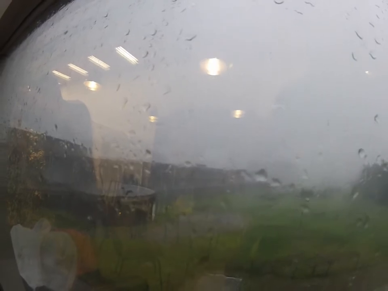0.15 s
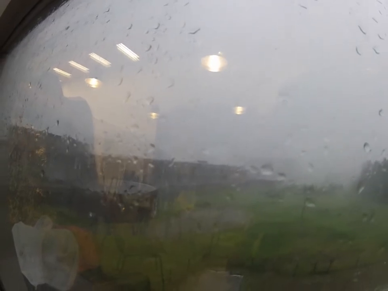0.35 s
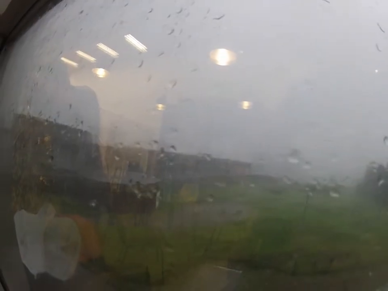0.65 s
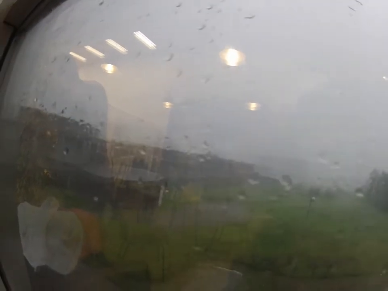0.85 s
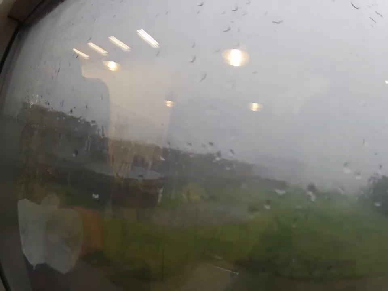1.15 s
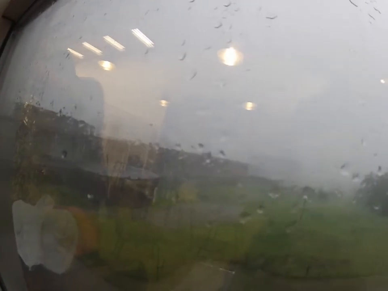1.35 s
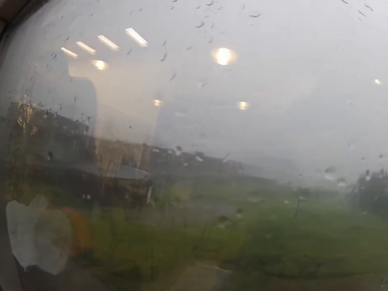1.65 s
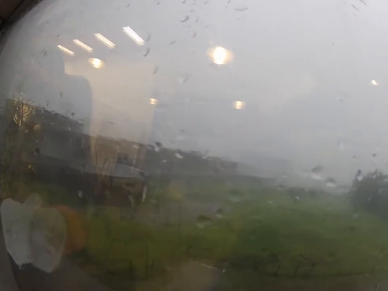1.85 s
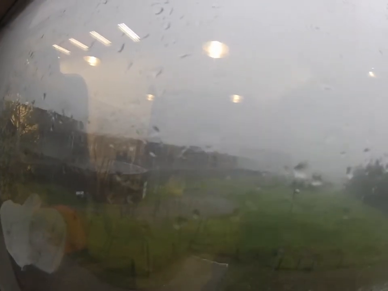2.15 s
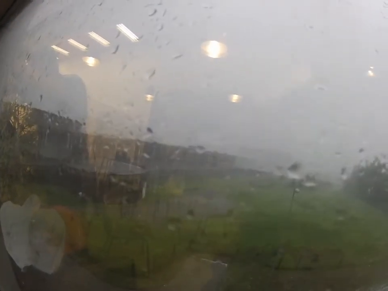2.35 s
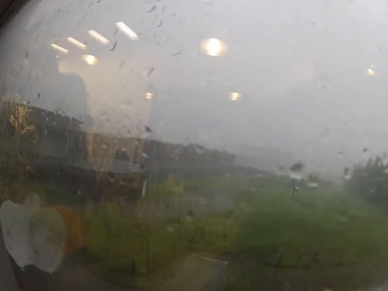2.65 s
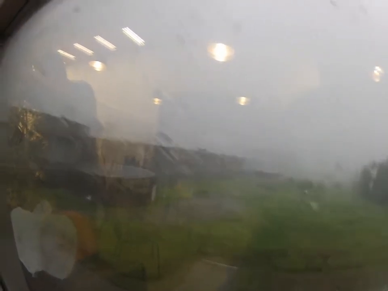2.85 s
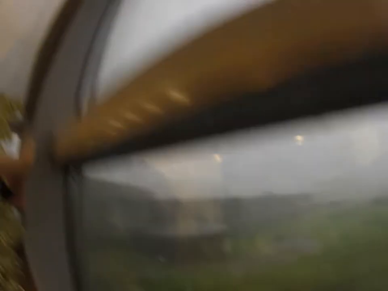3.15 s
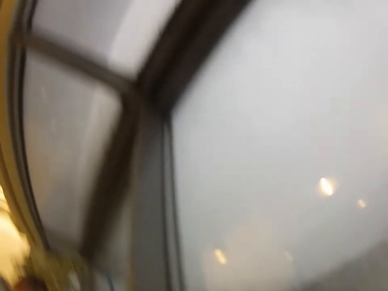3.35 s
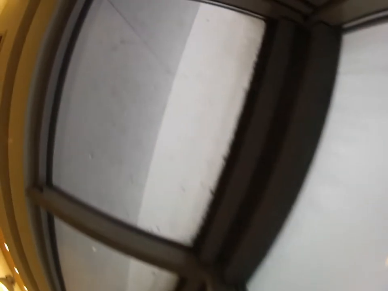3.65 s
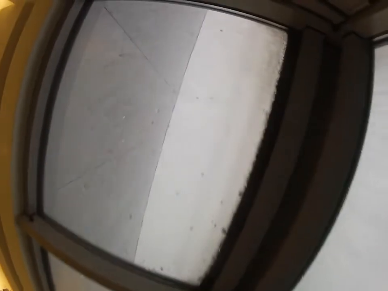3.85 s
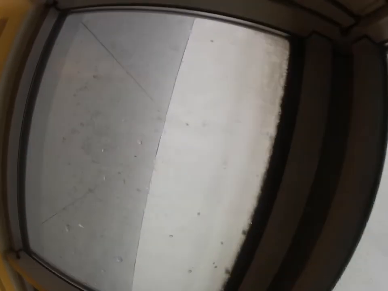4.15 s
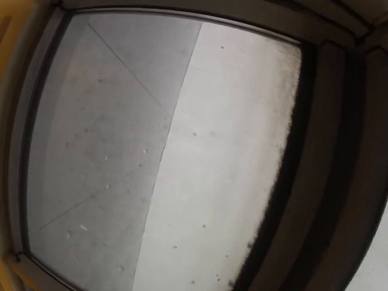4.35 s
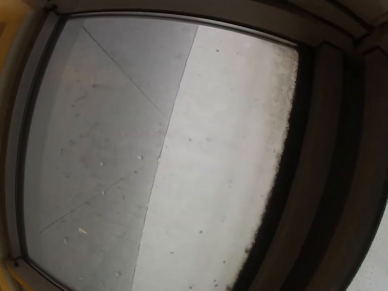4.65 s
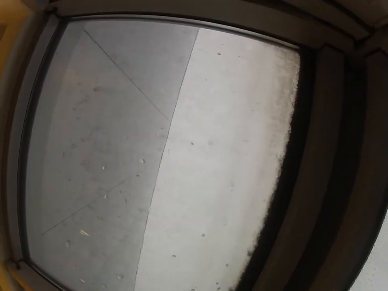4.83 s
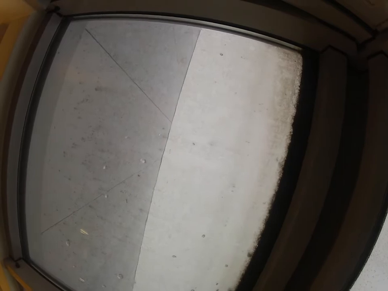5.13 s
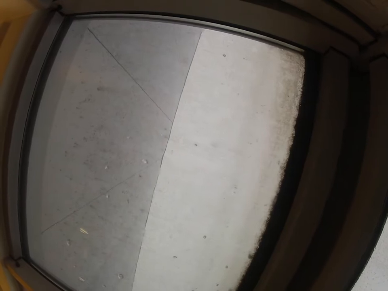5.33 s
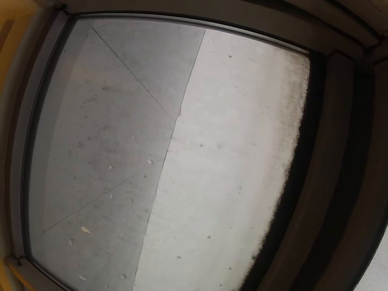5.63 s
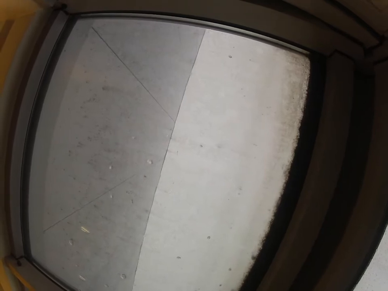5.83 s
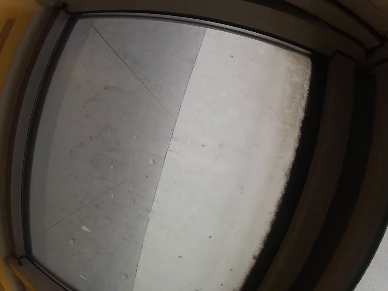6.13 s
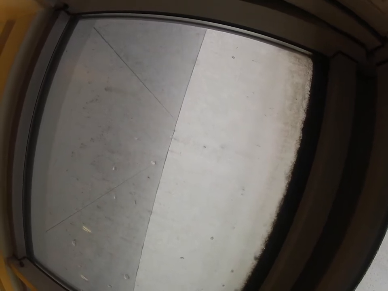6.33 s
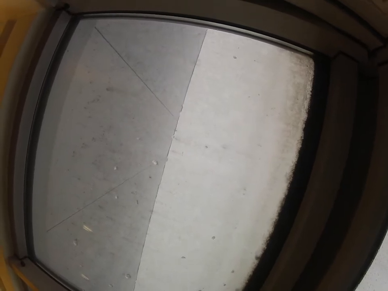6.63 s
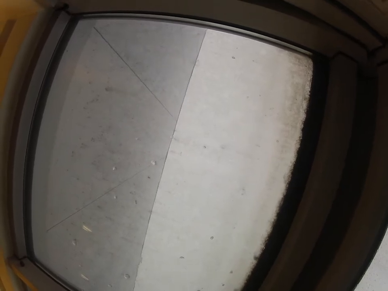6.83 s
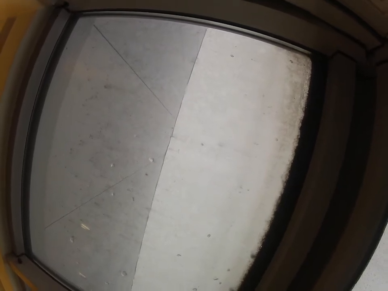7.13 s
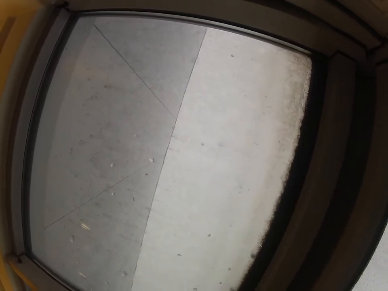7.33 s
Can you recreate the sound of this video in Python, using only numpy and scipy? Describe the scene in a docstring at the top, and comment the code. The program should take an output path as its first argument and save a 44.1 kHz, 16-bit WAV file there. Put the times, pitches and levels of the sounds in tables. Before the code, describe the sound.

A hailstorm heard through glass in a room with a faint reverberant tail: quiet rumble, hiss and light patter, with isolated crisp taps. Close and dry over it are handling sounds: soft thuds, rough skin squeaks, a violent plastic clack at about two seconds, then more rubbing and knocks while the camera is turned. The end is calmer, with taps on the pane. Rough, gritty small-microphone treble.

```python
"""Hail on a window pane

A hail storm is heard indoors through a pane, by a small microphone shut in a plastic housing.
Shaped noise gives the storm's rumble, roar and hiss; short noise bursts give the hailstones on the glass.
Damped sines make the housing knock and thud; bands of noise make it squeak and rattle as the hand rubs it.
The converter holds each sample, which mirrors the sound into the treble."""
import sys
import numpy as np
from scipy import signal
from scipy.fft import rfft, irfft, next_fast_len
from scipy.io import wavfile

SR = 44100
rng = np.random.default_rng(int(sys.argv[2]) if len(sys.argv) > 2 else 0)


def dump_mix(stems):
    """Bounce the given channels to the path in sys.argv[1] as a 16-bit WAV at rate SR."""
    frames = np.atleast_2d(stems).T  # one column per channel
    limited = np.clip(frames, -1, 1)  # hard clip at full scale
    pcm = np.round(limited * 32767).astype(np.int16)
    wavfile.write(sys.argv[1], SR, pcm)


N = 330121

# Gusts of the storm: (time [s], rumble level [dB], pane roar level [dB], hiss level [dB])
STORM_GUSTS = [(0, -54, -48.5, -53), (.35, -50, -49, -56.5), (1.21, -53.5, -49.5, -55),
               (1.87, -50, -50.5, -56), (2.04, -46, -50, -57), (2.48, -41.5, -47.5, -56.5),
               (2.75, -52, -49.5, -55.5), (2.92, -48, -55.5, -57), (3.27, -46.5, -49.5, -55.5),
               (3.54, -47, -56.5, -56), (4.11, -42, -61.5, -55), (4.4, -45, -63, -59),
               (4.71, -48, -57.5, -57), (5.4, -48, -59, -56.5), (5.98, -51, -58.5, -59.5),
               (6.78, -49, -57.5, -58.5), (7.49, -48.5, -62.5, -57.5)]
# Relative power density of wind rumble, pane roar and hiss: (frequency [Hz], level [dB])
RUMBLE_SPECTRUM = [(20, 6.5), (40, 3.5), (90, 2), (140, -7), (220, -13.5), (400, -58.5)]
ROAR_SPECTRUM = [(60, -9), (130, 7.5), (250, 3), (400, -5), (600, -17.5), (1000, -23.5)]
HISS_SPECTRUM = [(200, -21.5), (380, -0.5), (600, -5.5), (800, -11.5), (1050, -7.5), (1400, -13.5),
                 (1640, -8.5), (1850, -11), (2200, -5), (2650, -14), (3250, -13), (3800, -13.5),
                 (4200, -22.5), (5400, -19.5), (6500, -24.5)]
# The same for the scrape of rubbing: (frequency [Hz], level [dB])
SCRAPE_SPECTRUM = [(600, -29), (950, 0.5), (1300, 2.5), (1700, -2), (2000, -6)]
# Hailstones on the glass: (time [s], splash level [dB], centre [Hz], T60 [s],
# pane ring re splash [dB], glassy ping re splash [dB])
HAILSTONES = [(0.6679, -51, 2960, 0.2, -21, -23), (1.167, -47, 3310, 0.12, -21, -28),
              (1.1898, -48.5, 2230, 0.086, -22, -23), (1.649, -53, 2130, .12, -18, -27),
              (2.13, -54.5, 1930, .1, -21, -24), (2.5286, -46, 2040, 0.07, -32, -2.5),
              (2.7258, -50.5, 1570, 0.099, -21, -29), (2.9523, -44, 3050, 0.11, -6, 3.5),
              (3.4892, -53, 2200, 0.12, -15, -3), (4.6711, -45.5, 3250, 0.12, 2, -17),
              (4.7635, -31.5, 2570, 0.042, -5, -12), (4.7769, -38.5, 1950, 0.029, -28, -23),
              (4.9067, -50, 2830, 0.11, -5, -20), (4.929, -57, 2130, .089, -13, -26),
              (5.2355, -54, 2250, 0.14, -4, -26), (5.881, -61, 3250, .051, 6, -23),
              (6.4406, -61, 3210, 0.068, 4, -23), (6.5297, -50.5, 2260, 0.062, -5, -29),
              (6.549, -52, 2680, 0.2, -15, -28), (6.8389, -55.5, 2050, .1, -16, -27),
              (6.948, -54.5, 3140, .18, -8, -28), (7.2198, -57.5, 2140, 0.24, -15, -22)]
# Resonances of the pane: (frequency [Hz], width [Hz], level [dB])
PANE_MODES = [(1600, 94, -17), (2070, 83, -21), (3230, 120, 17), (3550, 120, -4)]
# Soft thuds of the hand: (time [s], level before the envelope [dB], frequency [Hz])
HAND_THUDS = [(0.449, -28, 93), (2.338, -28.5, 80.7), (2.699, -30.5, 101), (2.737, -32, 58.5),
              (3.085, -26.5, 124), (3.119, -29.5, 133), (3.429, -29.5, 108), (3.67, -35.5, 144),
              (3.766, -27, 94), (3.847, -28.5, 144), (4.141, -29, 51), (4.47, -38, 112), (5.228, -31, 65),
              (5.921, -35, 79), (6.167, -34, 75.4), (6.588, -37.5, 113), (6.77, -32.5, 76),
              (7.029, -37, 51), (7.091, -31, 99)]
# Rubbing strokes: (time of top [s], rise [s], T60 [s], squeak level [dB], squeak centre [Hz],
# upper band re squeak [dB], upper band centre [Hz], scrape re squeak [dB])
RUB_STROKES = [(0.487, 0.0096, 0.83, -48.5, 2064, -9, 3840, -23),
               (.64, 0.072, 1.6, -55, 2024, -10.5, 3600, -17),
               (1.185, .015, 1.4, -56, 2165, -5.5, 3430, -8), (2.44, 0.15, .7, -59, 2050, -12, 3590, -9),
               (3.19, .04, 0.34, -56.5, 2170, -7, 3650, -11), (3.42, 0.32, 1.5, -57.5, 2380, -8, 3670, -3),
               (3.64, 0.21, 0.27, -54, 2415, -11, 3510, -8), (3.765, 0.19, 0.35, -51, 2400, -14, 3600, -4),
               (3.855, 0.1, 0.3, -53.5, 2325, -9, 3570, -2.5),
               (4.098, 0.25, 0.052, -45.5, 2238, -6, 3774, -6.5),
               (4.56, 0.18, 0.81, -66, 2230, 3, 3290, -12)]
# Modes of the housing walls: (frequency [Hz], level [dB], T60 [s])
HOUSING_MODES = [(332, -15, 0.034), (506, -10.5, 0.019), (805, -5.5, 0.012), (975, -2, 0.0084),
                 (1214, -8.5, 0.018), (1654, 0, 0.012), (2274, -0.5, 0.014), (3230, -15, 0.011)]
# Loose parts rattling: (time of top [s], rise [s], T60 [s], low modes level [dB], high modes re low [dB])
RATTLE_SWELLS = [(1.936, 0.011, 0.05, -25.5, -9), (1.96, .008, 0.1, -37, -31), (3.191, 0.016, .05, -50, -8),
                 (3.244, 0.017, 0.067, -33, -20), (4.236, 0.0026, 0.051, -47, -17),
                 (4.268, 0.0014, 0.029, -30.5, -26)]
# Pings of the latch: (time [s], level before the envelope [dB])
LATCH_STRIKES = [(4.234, -31.5)]
# Knocks on the housing: (time [s], direction [sign], thud level before low-pass [dB], thud frequency [Hz],
# thud T60 [s], crack level before low-pass [dB], hardness as crack cutoff [Hz])
HOUSING_KNOCKS = [(1.9068, 1, -1, 140, 0.039, -3.5, 2500), (1.909, -1, -8.5, 213, 0.026, -4.5, 2480),
                  (1.9358, -1, -16, 176, 0.074, -19, 2170), (1.9554, -1, -11, 172, 0.055, -25, 910),
                  (1.9725, 1, -10, 167, 0.054, -52, 610), (1.995, 1, -25.5, 94, 0.27, -53, 400),
                  (3.22, 1, -30, 160, .04, -31.5, 1300), (3.2346, 1, -25, 146, 0.092, -43, 900),
                  (3.2416, 1, -15, 154.6, 0.094, -21.5, 1160), (3.261, -1, -22, 140, .061, -30.5, 1280),
                  (3.78, -1, -39, 147, .04, -35.5, 2600), (4.233, 1, -12, 128, .04, -26, 1900),
                  (4.2657, 1, -13.5, 127, 0.018, -28.5, 900), (4.267, 1, -15.5, 129, 0.053, -32, 4500)]

PATTER_PER_S, PATTER_DB, PATTER_T60_S = 53, -71.5, 0.014
PING_HZ, PING_WIDTH_HZ, PING_T60_S = 4740, 1400, 0.07
HALL_T60_S, HALL_DB = 1, -19
THUD_T60_S = 0.073
SQUEAK_CORNER_HZ, UPPER_CORNER_HZ = 100, 170   # of the noise that modulates each band's carrier
SWELL_FROM_DB = -28.5
LATCH_HZ, LATCH_T60_S = 3980, .016
HOLD_HZ, OVERLOAD = 12000, .7   # sampling rate; clipping amplitude
CUTOFF_HZ = 15800


def from_db(db):
    """Level law: amplitude gain is ten to the power of decibels over twenty."""
    return 10 ** (np.asarray(db) / 20)


def rms_one(x):
    """Normalization of power: scale to unit rms."""
    return x / np.sqrt(np.mean(x ** 2) + 1e-20)


def in_time(rows):
    """Linear interpolation: table columns become curves with one value a sample."""
    s, *columns = np.transpose(rows)
    return [np.interp(np.arange(N) / SR, s, c) for c in columns]


def slow(rate_hz):
    """Low-pass filtering: white noise through two equal one-pole stages fluctuates slowly, rms 1."""
    r = np.exp(-2 * np.pi * rate_hz / SR)
    noise = rng.standard_normal(N + SR)
    return rms_one(signal.lfilter([1], [1, -2 * r, r * r], noise)[SR:])   # first second settles the filter


def coloured(spectrum):
    """Spectral shaping: white noise is weighted by a table in the frequency domain, rms 1."""
    size = next_fast_len(N)
    hz, level_db = np.transpose(spectrum)
    log_hz = np.log(np.arange(size // 2 + 1) * SR / size + 1)
    gain = from_db(np.interp(log_hz, np.log(hz), level_db, left=-70, right=-70))
    white = rfft(rng.standard_normal(size))
    return rms_one(irfft(gain * white, size)[:N])


def narrow(corner_hz):
    """Modulation: slow complex noise on a carrier is a narrow band; returns a function of its centre."""
    shape = slow(corner_hz) + 1j * slow(corner_hz)
    return lambda hz: np.real(shape * np.exp(2j * np.pi * hz * np.arange(N) / SR))


def fade(t, t60):
    """Exponential decay: the level falls 60 dB in each t60."""
    return from_db(-60 * t / t60)


def swell(s, rise_s, t60):
    """Exponential growth and decay: the level climbs evenly in dB to its top at s, then dies away."""
    t = np.arange(N) / SR - s
    climb = from_db(-SWELL_FROM_DB * np.clip(t / rise_s, -1, 0))
    return (t > -rise_s) * np.where(t < 0, climb, fade(np.maximum(t, 0), t60))


def resonance(x, hz, width_hz):
    """Damped oscillator: a two-pole resonance with gain 1 on top."""
    r = np.exp(-np.pi * width_hz / SR)
    zeros = np.array([1, 0, -1]) * (1 - r * r) / 2
    poles = [1, -2 * r * np.cos(2 * np.pi * hz / SR), r * r]
    return signal.lfilter(zeros, poles, x)


def add(out, s, sound):
    """Superposition: mix a short sound in at s seconds."""
    at = round(s * SR)
    out[at:at + len(sound)] += sound[:N - at]


def storm():
    """Turbulent noise: lumpy wind rumble, the roar of the pane and the hiss of rain, each in gusts."""
    rumble_db, roar_db, hiss_db = in_time(STORM_GUSTS)
    rumble = from_db(rumble_db + 1.6 * slow(12)) * coloured(RUMBLE_SPECTRUM)
    roar = from_db(roar_db + 1.3 * slow(15)) * coloured(ROAR_SPECTRUM)
    hiss = from_db(hiss_db + .8 * slow(6)) * coloured(HISS_SPECTRUM)
    return rumble + roar + hiss


def patter():
    """Shot noise: small stones at random moments, mostly faint, each a few milliseconds long."""
    born = rng.random(N) < PATTER_PER_S / SR
    sizes = born * from_db(3.6 * np.minimum(rng.exponential(1, N), 4))
    decay_per_sample = from_db(-60 / (PATTER_T60_S * SR))
    envelope = signal.lfilter([1], [1, -decay_per_sample], sizes)
    return from_db(PATTER_DB) * envelope * coloured(HISS_SPECTRUM)


def hail():
    """Impact excitation: each stone is a dying noise burst whose splash drives the pane's resonances."""
    out, t = np.zeros(N), np.arange(SR // 4) / SR
    bursts = rng.standard_normal((len(HAILSTONES), len(t)))
    for (s, splash_db, hz, t60, ring_db, ping_db), burst in zip(HAILSTONES, bursts):
        band = signal.butter(1, [.5 * hz, 1.46 * hz], "band", fs=SR)
        splash = rms_one(signal.lfilter(*band, signal.lfilter(*band, burst)))
        ring = rms_one(sum(from_db(mode_db) * resonance(splash, mode_hz, width_hz)
                           for mode_hz, width_hz, mode_db in PANE_MODES))
        ping = resonance(burst, PING_HZ, PING_WIDTH_HZ)
        ping = rms_one(resonance(ping, PING_HZ, PING_WIDTH_HZ))
        tones = splash + from_db(ring_db) * ring + from_db(ping_db) * fade(t, PING_T60_S) * ping
        envelope = fade(t, t60) * (1 - fade(t, 0.0014))
        add(out, s, from_db(splash_db) * envelope * tones)
    return out


def hall(x):
    """Diffuse reverberation: convolution with dying noise; the walls swallow the treble."""
    t = np.arange(SR) / SR
    treble_loss = signal.butter(4, 4000, fs=SR)
    tail = signal.lfilter(*treble_loss, rng.standard_normal(SR)) * fade(t, HALL_T60_S)
    return signal.fftconvolve(x, tail / np.sqrt(np.sum(tail ** 2)))[:N]


def thuds():
    """Damped free oscillation: the grip shifts and the housing swings a few cycles, with a soft start."""
    out, t = np.zeros(N), np.arange(SR // 3) / SR
    envelope = fade(t, THUD_T60_S) * (1 - fade(t, 0.012))
    for s, level_db, hz in HAND_THUDS:
        add(out, s, from_db(level_db) * envelope * np.sin(2 * np.pi * hz * t))
    return out


def rubbing():
    """Stick-slip friction of skin, rendered as noise: a rough squeak, an upper band and a broad scrape."""
    scrape = coloured(SCRAPE_SPECTRUM)
    squeak, upper = narrow(SQUEAK_CORNER_HZ), narrow(UPPER_CORNER_HZ)
    rubs = np.zeros(N)
    for s, rise_s, t60, squeak_db, squeak_hz, upper_db, upper_hz, scrape_db in RUB_STROKES:
        bands = squeak(squeak_hz) + from_db(upper_db) * upper(upper_hz) + from_db(scrape_db) * scrape
        rubs += from_db(squeak_db) * swell(s, rise_s, t60) * bands
    return from_db(2.1 * slow(16.0)) * rubs   # uneven strength


def rattles():
    """Modal excitation: dense uneven soft clicks of loose parts drive the low and high housing modes."""
    clicks = (rng.random(N) < 1500 / SR) * rng.standard_normal(N)   # 1500 a second on average
    clicks = signal.lfilter(*signal.butter(4, 2800, fs=SR), clicks)
    walls = [from_db(mode_db) * resonance(clicks, hz, np.log(1000) / np.pi / t60)   # width from T60
             for hz, mode_db, t60 in HOUSING_MODES]
    low, high = rms_one(sum(walls[1:5])), rms_one(sum(walls[5:]))
    return sum(from_db(low_db) * swell(s, rise_s, t60) * (low + from_db(high_db) * high)
               for s, rise_s, t60, low_db, high_db in RATTLE_SWELLS)


def latch():
    """Single-mode ringing: the latch pings as a damped sine with a soft start."""
    out, t = np.zeros(N), np.arange(SR // 10) / SR
    envelope = fade(t, LATCH_T60_S) * (1 - fade(t, 0.0053))
    for s, level_db in LATCH_STRIKES:
        add(out, s, from_db(level_db) * envelope * np.sin(2 * np.pi * LATCH_HZ * t))
    return out


def knocks():
    """Impact response: the whole housing jumps (thud), its walls ring (crack); soft contacts are dull."""
    out, t = np.zeros(N), np.arange(SR // 2) / SR
    spread_db = 1.5 * rng.standard_normal((len(HOUSING_KNOCKS), len(HOUSING_MODES)))
    for knock, spread in zip(HOUSING_KNOCKS, spread_db):
        s, direction, thud_db, thud_hz, t60, crack_db, hard_hz = knock
        # a short push, then a longer swing back
        swing = fade(t, t60) * np.cos(2 * np.pi * thud_hz * t - .3)
        ringing = sum(from_db(mode_db + extra_db) * fade(t, mode_t60) * np.sin(2 * np.pi * hz * t)
                      for (hz, mode_db, mode_t60), extra_db in zip(HOUSING_MODES, spread))
        # the heavy body is pushed slowly
        thud = signal.lfilter(*signal.butter(2, 0.35 * hard_hz, fs=SR), swing)
        crack = signal.lfilter(*signal.butter(2, hard_hz, fs=SR), ringing)
        add(out, s, np.sign(direction) * (from_db(thud_db) * thud + from_db(crack_db) * crack))
    return out


def scene():
    """Airborne and structure-borne paths: hailstones get the hall; contact sounds arrive dry."""
    stones = hail()
    airborne = storm() + patter() + stones + from_db(HALL_DB) * hall(stones)
    contact = thuds() + rubbing() + rattles() + latch() + knocks()
    return (airborne + contact)[None]


def record(dry):
    """Sample-and-hold imaging: band limit, slow sampling, overload, each sample held four steps, top cut."""
    smooth = signal.sosfilt(signal.butter(1, 40, "high", fs=SR, output="sos"), dry[0])
    smooth = signal.sosfilt(signal.butter(6, 5300, fs=SR, output="sos"), smooth)
    sampled = np.clip(signal.resample_poly(smooth, HOLD_HZ, SR), -OVERLOAD, OVERLOAD)
    held = signal.resample_poly(np.repeat(sampled, 4), SR, 4 * HOLD_HZ)[:N]
    held = np.pad(held, (0, N - len(held)))
    return signal.sosfilt(signal.cheby2(12, 60, CUTOFF_HZ, fs=SR, output="sos"), held)[None]


dry = scene()
out = record(dry)
dump_mix(out)
```